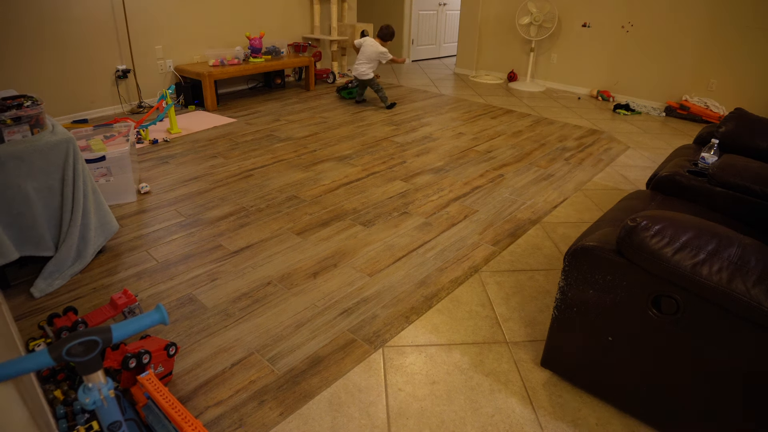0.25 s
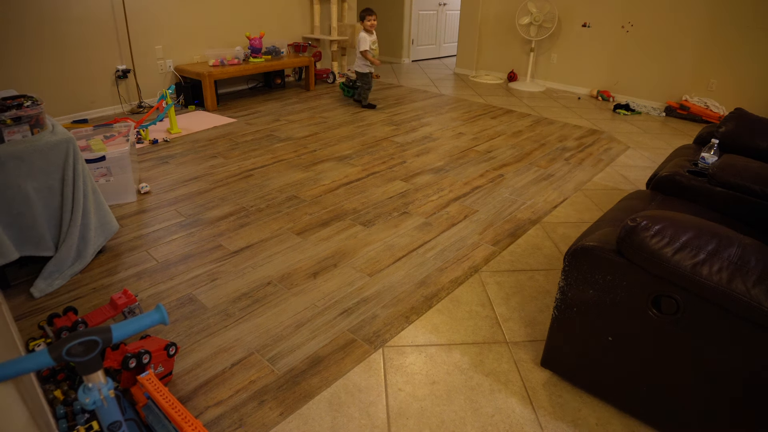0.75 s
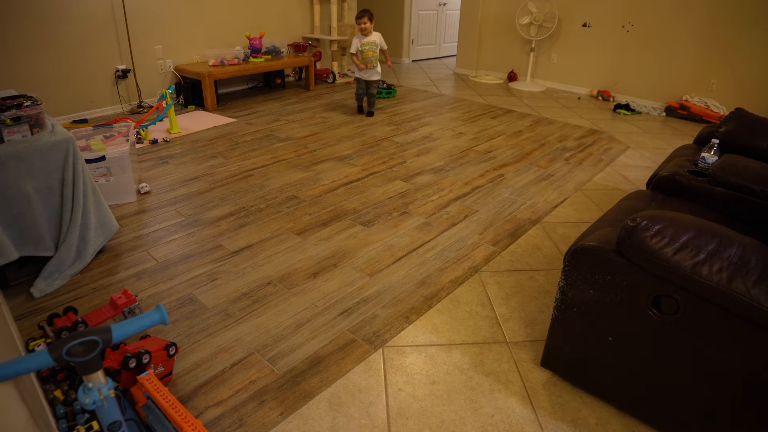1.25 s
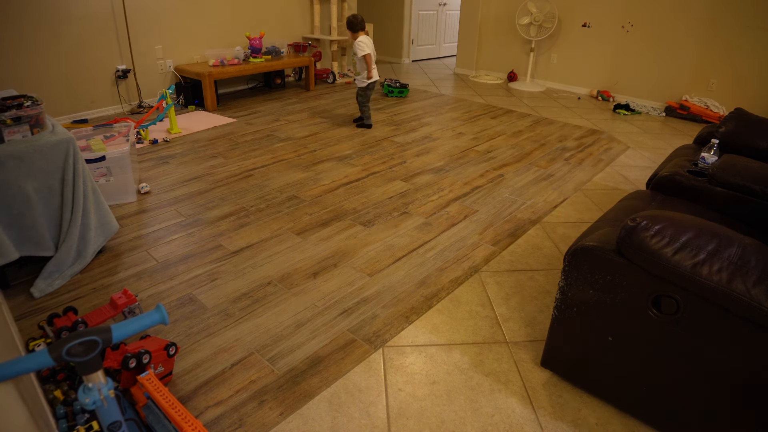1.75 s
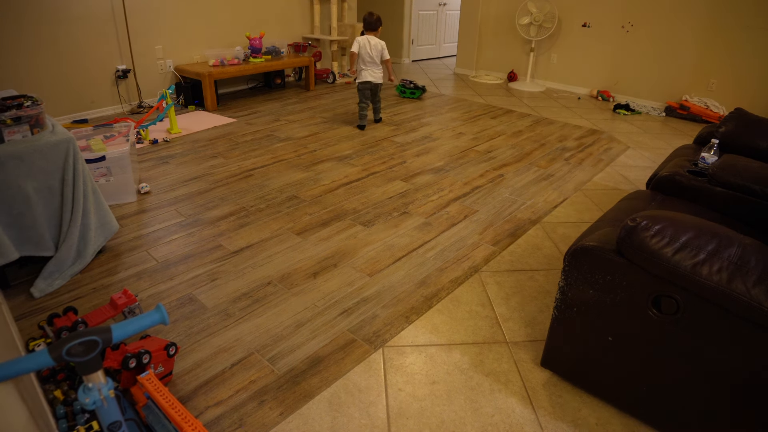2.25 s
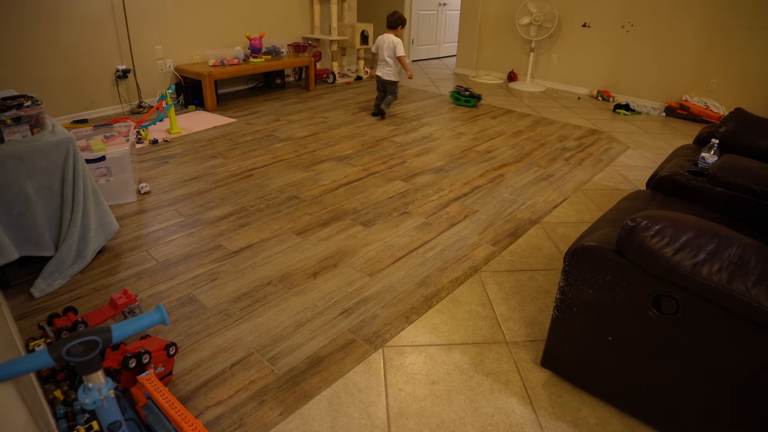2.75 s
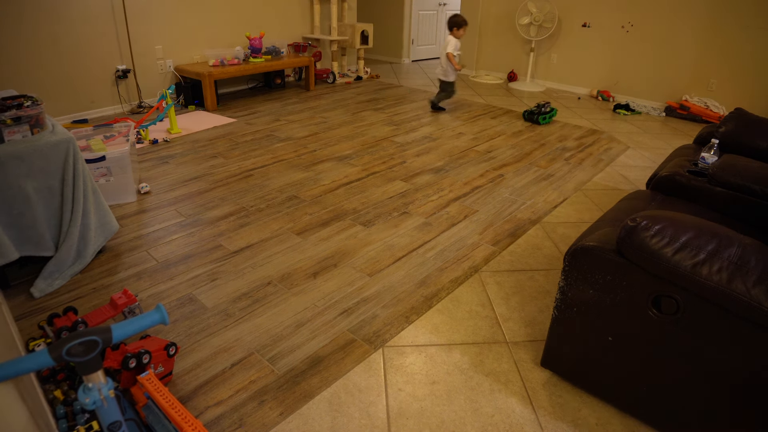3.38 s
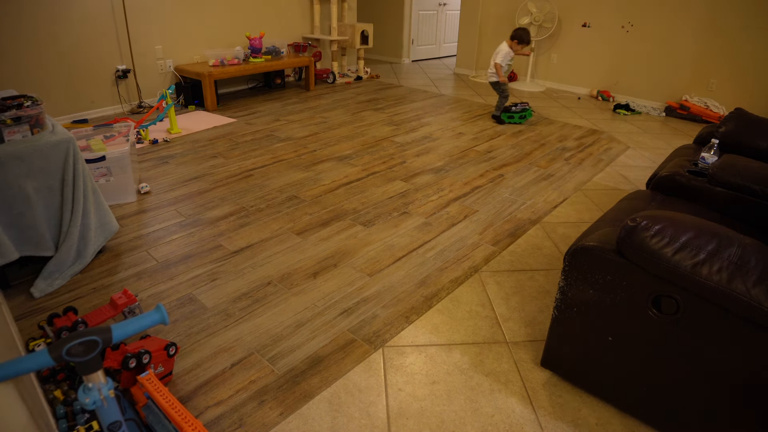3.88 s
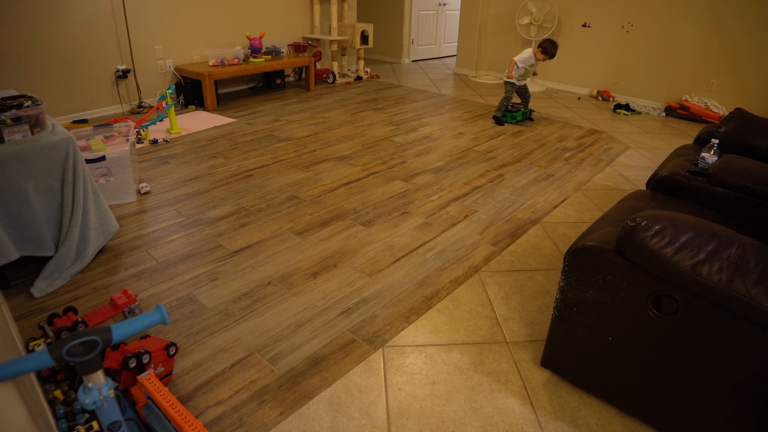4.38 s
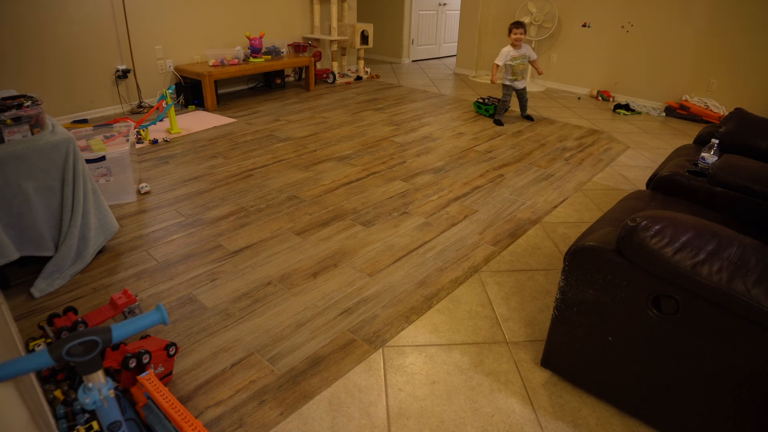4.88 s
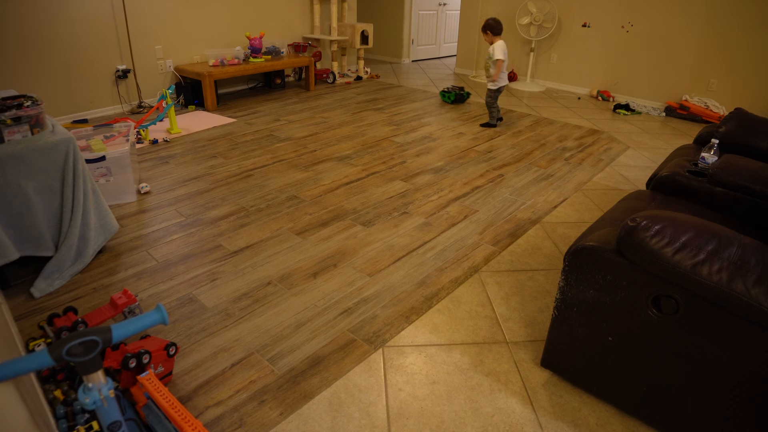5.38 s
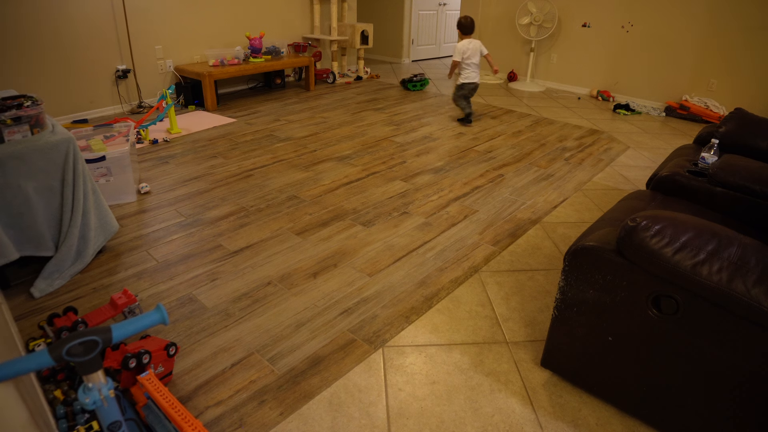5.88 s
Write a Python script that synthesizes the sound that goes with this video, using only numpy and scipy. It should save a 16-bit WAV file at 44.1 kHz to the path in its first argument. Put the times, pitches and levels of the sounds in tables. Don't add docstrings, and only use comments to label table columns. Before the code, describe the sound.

A large bare room with a hard floor, one microphone several metres from a small toy truck; faint still air and mains hum lie beneath. The truck is already rolling, its motor cut at about 0.1 s. It whines again from 0.45 to 1.1 s, with a hard knock and squeal at 0.6, then gives a short spurt from 1.3 to 1.8. The longest run, 2.0 to 3.1, starts with a bright, strained whine and is jolted by a bump at 2.4. Another spurt runs 3.45 to 3.95; a brief scuffing shove follows at 4.1 while coasting. A very short spurt comes at 4.2 to 4.5, then a long one from 4.7 to almost 6, wavering, dipping sharply near 5.15 and bumping at 5.55. Throughout, shrill gritty gear whine near 3.5 kHz with hissing overtones, plastic clatter, wandering squeals, tyre scrub and light floor rumble, smeared by room echo.

```python
import sys
import numpy as np
from scipy import signal
from scipy.fft import rfft, irfft, next_fast_len
from scipy.io import wavfile
from scipy.ndimage import uniform_filter1d, map_coordinates

SR = 44100
rng = np.random.default_rng(int(sys.argv[2]) if len(sys.argv) > 2 else 0)


def wrap_up_sound(samples):
    columns = np.atleast_2d(samples).T
    tamed = np.clip(columns, -1, 1)
    steps = np.round(tamed * 32767).astype(np.int16)
    wavfile.write(sys.argv[1], SR, steps)


def gain_from_db(level_db):
    decades = np.asarray(level_db, float) / 20
    return 10 ** decades


N = 270818
TICKS = np.arange(0, N / SR, .002)

# f/Hz, density/dB
AIR_SPECTRUM = [(20, -32), (42, -22), (60, -9), (100, -12), (200, -1), (500, -6.5), (1500, -19),
                (5000, -21), (10000, -35), (16000, -60)]
# f/Hz, t60/s
ROOM_DECAY = [(200, 1), (2000, 1), (5000, 0.89), (12000, 0.67), (16000, 0.34)]
# f/Hz, density/dB
RUMBLE_SPECTRUM = [(60, -56), (150, -16), (300, -4), (500, -1), (750, -2.5), (1200, -24)]
# t/s, level/dB, half length/s
FLOOR_JOINTS = [(.12, 7, 0.13), (.47, -16, 0.09675), (.61, 4, .07), (1.02, 8, 0.33), (1.54, 4, .15),
                (3.03, 6, 0.0462), (2.07, -8, 0.055), (3.36, -12, .22), (3.68, 5, .12), (4.14, 12, 0.1138),
                (4.43, 5, 0.18), (4.63, 6, 0.092), (4.86, -3, 0.192), (5.3, 5, 0.3429), (5.97, 3.5, 0.0988)]
# f/Hz, density/dB
TYRE_SPECTRUM = [(250, -22), (600, -11.5), (950, -1.5), (1150, -4.5), (1600, -1), (2200, 0), (3000, -5.5),
                 (4500, -58)]
# t/s, peak level/dB
BUMP_KNOCKS = [
    (0.436, -20),
    (0.6187, 4),
    (2.4193, -1),
    (2.8994, -37),
    (3.0191, -16),
    (4.1118, -22),
    (4.1297, -23),
    (5.1765, -16),
    (5.5476, -7),
    (5.869, -20),
]
# f/Hz, width/Hz, level/dB
SHELL_MODES = [
    (970, 191.3, 1),
    (1330, 97, 8),
]
# t/s, level/dB, time to lose 12 dB/s
BODY_RINGS = [(.08, -38, .1), (.2, -44, .08), (.62, -40, .12), (1.09, -40.5, .3), (1.88, -39, .1),
              (2.07, -35, .07), (2.9, -45, .2), (3.36, -40, .25), (3.85, -46, .3), (4.26, -46, .3),
              (4.89, -40.5, .15), (5.32, -42, .1), (5.87, -34, .06), (5.94, -36, .07)]
# f/Hz, level/dB
CHASSIS_COLOUR = [(1500, 5), (2600, 0), (3500, -1.5), (4100, -5), (5400, 14), (6200, -5), (6800, -12),
                  (7500, -5.5), (8700, -11), (10200, -3.5), (12500, -21), (15700, -30)]
# f/Hz, density/dB
CLATTER_SPECTRUM = [(1200, -44), (2200, -11.5), (2800, -5), (3500, -5), (4100, -7.5), (5400, -4.5),
                    (6200, -8.5), (6900, -15.5), (8000, -16), (11000, -32)]
# f/Hz, density/dB
HISS_SPECTRUM = [(5500, -12), (7500, -4), (8700, -5), (10200, -3.5), (11500, -5.5), (13000, -10.5),
                 (15000, -33), (16500, -33)]
# t/s, gear clatter level/dB, treble facing us level/dB, tyre scrub level/dB
DRIVING_LOAD = [(0, -32, -4.5, 1), (.12, -30, -10.5, 2.5), (.61, -31.5, -8, -0.5), (.79, -31, -9.5, -0.5),
                (.9, -31.5, -8, 1), (1.4, -29.5, -7.5, -1), (1.54, -35, -3.5, 0.5), (1.76, -35.5, -6.5, -2),
                (2.15, -30, -5.5, -0.5), (2.91, -30.5, -6.5, 1), (2.99, -33, -5, -1), (3.7, -31, -4.5, 0),
                (4.3, -29.5, -8, 0.5), (4.62, -30, -8, 0.5), (4.9, -31.5, -5, -1.5), (5.35, -31, -8.5, 1.5),
                (5.76, -34.5, -8, -2), (5.88, -30.5, -8.5, 1)]
# t/s, level/dB, half length/s
LOAD_JOLTS = [
    (.77, -2, .05),
    (1.81, 3.5, 0.034),
    (1.86, 3, 0.029),
    (1.895, 4, .025),
    (3.21, -4, 0.12114),
    (3.96, 3, 0.0508),
    (4.5, 1, 0.0596),
    (5.06, -2, .04),
]
# t/s, highest treble level/dB, half length/s
TREBLE_DULLING = [
    (.77, -13, .1),
    (2.95, 4, .1),
    (4.14, -7, .07),
    (5.65, -8, .3),
    (6.02, -4, 0.21),
]
# t/s, level/dB, time to lose 12 dB/s, pitch f/Hz, glide/Hz per s
GEAR_SQUEALS = [(.1, -35, .11, 5700, 1000), (.63, -25.5, .11, 5550, 500), (.73, -31, .09, 5550, 0),
                (.88, -34, .1, 5300, 6000), (1.08, -38, .15, 5400, -1500), (1.41, -31, .05, 4780, 1800),
                (1.78, -37, .03, 5300, 0), (1.82, -36, .04, 4650, 0), (2.12, -32, .08, 5900, 3000),
                (2.44, -31, .06, 5650, -10000), (2.53, -31, .06, 4800, -4000),
                (2.61, -29.5, .09, 5600, 1500), (3.14, -36.5, .07, 5400, 500),
                (3.94, -33, .07, 5350, -9000), (4.28, -33, .05, 5400, 4000), (4.47, -35, .09, 5900, -6000),
                (4.56, -39, .12, 4950, -1000), (4.78, -37, .08, 5650, 9000), (4.88, -33, .09, 6120, 0),
                (5.02, -37, .08, 5880, -3000), (5.1, -30, .025, 5230, 0), (5.45, -41, .1, 5320, 0),
                (5.89, -32, .08, 5350, 7000), (5.99, -33, .06, 4750, -3000)]
# power on t/s, power off t/s, coasting fade/dB per s,
# second overtone level/dB while labouring, the same at speed level/dB
TRIGGER_PULLS = [
    (-.5, .135, 110, -3, -4),
    (.46, 1.08, 91, -5, -5),
    (1.332, 1.785, 90, -6, -6),
    (2.02, 3.125, 57, 16, -2),
    (3.446, 3.95, 140, 6, -1),
    (4.188, 4.5, 86, -1, -8),
    (4.695, 5.97, 109, -5, -2),
]
# t/s, tooth rate at full spin f/Hz
TOOTH_RATE = [(0, 3504), (.57, 3500), (.7, 3290), (1.05, 3465), (1.45, 2940), (1.5, 3765), (2.55, 3620),
              (2.8, 3400), (2.99, 3772), (3.03, 3430), (3.09, 3664), (3.9, 3573), (4.5, 3401), (4.78, 3700),
              (5.16, 3660), (5.2, 3420), (5.58, 3790), (5.83, 3420)]
# t/s, level under power/dB
WHINE_LEVEL = [(0, -23), (.13, -28.5), (.6, -28.5), (.7, -29.5), (1.05, -28), (1.48, -37.5), (1.53, -28),
               (1.77, -32), (2.27, -25.5), (2.6, -28.5), (2.74, -24.5), (3.12, -27.5), (3.62, -25.5),
               (3.93, -25.5), (4.36, -31), (4.9, -25), (5.46, -24.5), (5.95, -29)]
# t/s, level/dB, half length/s
TOOTH_SLIPS = [
    (1.45, -6, 0.051),
    (2.5, -6, .05),
    (2.96, -15, 0.057),
    (3.031, 4, 0.02592),
    (4.417, 8, 0.0408),
    (5.062, -7, .035),
    (5.152, -19, .03),
    (5.176, 11.5, 0.01515),
    (5.217, -5, 0.06),
    (5.514, -4, 0.055),
]
# multiple, level/dB
TOOTH_OVERTONES = [
    (1, -2.5),
    (2, -4.5),
    (3, -7),
    (4, 5),
]
# t/s, second overtone level/dB, half length/s
PINION_TURNS = [
    (1.02, 3, .1),
    (2.27, 2, .06),
    (2.82, 4, .1),
    (4.38, 8, .06),
    (4.9, 4, .08),
    (5.2, -5, .2),
    (5.76, 6, 0.13),
    (5.95, -8, .1),
]


def unit(x):
    return x / np.sqrt(np.mean(x ** 2) + 1e-20)


def along(points, hz):
    f, v = np.transpose(points)
    return np.interp(np.log(hz + 1), np.log(f + 1), v)


def curves(rows):
    s, *cols = np.transpose(rows)
    return [np.interp(np.arange(N) / SR, s, c) for c in cols]


def wobble(rate):
    knots = rng.standard_normal(int(N * rate / SR) + 4)
    return map_coordinates(knots, [np.arange(N) * rate / SR])


def flutter(rate):
    knots = rng.standard_normal((int(N * rate / SR) + 4, 2)) @ [1, 1j]
    return np.interp(np.arange(N) * rate / SR, np.arange(len(knots)), knots)


def filtered(x, response):
    m = next_fast_len(N + SR // 2)
    return irfft(rfft(x, m) * response(np.fft.rfftfreq(m, 1 / SR)), m)[:N]


def rattle(spectrum, patchy_db, spiky_db):
    contacts = gain_from_db(spiky_db * np.pad(wobble(300), (0, 512)))
    z = signal.stft(rng.standard_normal(N + 512) * contacts, nperseg=512)[2]
    patches = uniform_filter1d(rng.standard_normal(z.shape), size=8, axis=0)
    patches = uniform_filter1d(patches, size=10, axis=1)
    x = signal.istft(z * gain_from_db(patchy_db * unit(patches)), nperseg=512)[1][:N]
    return unit(filtered(x, lambda hz: gain_from_db(along(spectrum, hz))))


def fine(control):
    return np.interp(np.arange(N) / SR, TICKS, control)


def bumps(rows):
    return fine(sum(db * np.maximum(1 - np.abs(TICKS - s) / half, 0) for s, db, half in rows))


def peaks(rows):
    s, db, half = np.transpose(rows)[:3, :, None]
    return db - 12 * np.abs(TICKS - s) / np.abs(half)


def clock(lag_s=0):
    on, off = np.transpose(TRIGGER_PULLS)[:2, :, None]
    return TICKS - lag_s - on, np.maximum(TICKS - lag_s - off, 0)


def latest(rows):
    now = np.maximum((clock()[0] >= 0).sum(axis=0) - 1, 0)
    return fine(rows[now, np.arange(len(TICKS))])


def motion(lag_s=0):
    start_db, start_s = 18.5, .07
    since, after = clock(lag_s)
    coasting_fade = np.transpose(TRIGGER_PULLS)[2, :, None]
    driven = start_db * np.minimum(since / start_s - 1, 0) - coasting_fade * after
    late = TICKS - 4.12
    shove = -4.5 + np.minimum(start_db * late / 0.022, -146 * late)
    return fine(np.maximum(driven.max(axis=0), shove))


def drive_level():
    backlash_db, backlash_s = 2.5, 0.071
    slack = latest(clock()[1]) / backlash_s
    slack_db = backlash_db * slack * np.exp(1 - slack)
    return curves(DRIVING_LOAD)[0] + motion() + slack_db + bumps(LOAD_JOLTS)


def house():
    t = np.arange(N) / SR
    hum = gain_from_db(-66.5 + 1.6 * wobble(9)) * np.sin(2 * np.pi * 119.5 * t + 0.42 * wobble(5.425))
    return hum + gain_from_db(-58.5) * rattle(AIR_SPECTRUM, patchy_db=1.2, spiky_db=0.0)


def room(x):
    hop = SR // 6
    spots = N // hop + 2
    hz, t, z = signal.stft(rng.standard_normal((spots, SR * 3 // 4)), SR, nperseg=256)
    t60 = np.maximum(along(ROOM_DECAY, hz), .1)[:, None]
    tails = signal.istft(z * gain_from_db(-60 * t / t60), SR, nperseg=256)[1]
    tails = tails / np.linalg.norm(tails, axis=1, keepdims=True)
    padded = np.pad(x, (hop, 3 * hop))
    pieces = np.lib.stride_tricks.sliding_window_view(padded, 2 * hop)[::hop][:spots]
    wet = signal.fftconvolve(pieces * np.hanning(2 * hop), tails, axes=1)
    out = np.zeros(N + 2 * SR)
    for k, piece in enumerate(wet):
        out[k * hop:][:len(piece)] += piece
    return 0.84 * out[hop - 300:][:N]


def floor_rumble():
    level_db = -47.5 + bumps(FLOOR_JOINTS) + 0.56 * motion(lag_s=0.038) + 0.5 * wobble(7)
    return gain_from_db(level_db - 0.4) * rattle(RUMBLE_SPECTRUM, patchy_db=2.0, spiky_db=-1.5)


def tyres():
    load_db, _, scrub_db = curves(DRIVING_LOAD)
    level_db = -33.5 + scrub_db + 0.53096 * (drive_level() - load_db.mean())
    return gain_from_db(level_db + 1.2 * wobble(9.2)) * rattle(TYRE_SPECTRUM, patchy_db=0.5, spiky_db=1.5)


def knocks():
    x, t = np.zeros(N + SR), np.arange(SR // 10) / SR
    for s, db in BUMP_KNOCKS:
        x[round(s * SR):][:len(t)] += gain_from_db(db - 18 - 60 * t / 0.027) * rng.standard_normal(len(t))
    return filtered(x[:N], lambda hz: gain_from_db(along(CHASSIS_COLOUR, hz)) * hz / (hz + 900))


def shell():
    def modes(f):
        return sum(gain_from_db(db) * 1j * f * w / (c * c - f * f + 1j * f * w) for c, w, db in SHELL_MODES)

    once = filtered(rng.standard_normal(N), modes)
    rest_db = -53
    strain_db = fine(np.maximum(peaks(BODY_RINGS).max(axis=0), rest_db))
    return gain_from_db(strain_db + 0.2 * motion() + 1.5 * wobble(30) - 1) * unit(filtered(once, modes))


def gears():
    facing_db = curves(DRIVING_LOAD)[1]
    since, after = map(latest, clock())
    hiss_db = facing_db - 0.5 * np.exp(-since / .1) - 9 * np.minimum(after / 0.065, 1)
    load = gain_from_db(drive_level() + 0.19 * wobble(14))
    clatter = gain_from_db(1.5) * rattle(CLATTER_SPECTRUM, patchy_db=2.0, spiky_db=1.0)
    grit = rattle(HISS_SPECTRUM, patchy_db=3.2, spiky_db=2.6)
    top = filtered(grit, lambda hz: 1 / (1 + (15000 / (hz + 1)) ** 8))
    beam_db = 0.68 * (hiss_db - facing_db.mean()) + bumps(TREBLE_DULLING) + 2.5 * wobble(25)
    hiss = gain_from_db(hiss_db - 0.35 + 1.8 * wobble(12)) * (grit - top + gain_from_db(beam_db) * top)
    return load * (clatter + hiss)


def idler():
    levels = peaks(GEAR_SQUEALS)
    s, _, _, pitch, glide = np.transpose(GEAR_SQUEALS)[:, levels.argmax(axis=0)]
    hz = fine(np.clip(pitch + glide * (TICKS - s), 4500, 6300))
    db = fine(levels.max(axis=0)) + .5 * motion()
    blur = flutter(900) + .8 * flutter(300)
    tone = gain_from_db(3 * wobble(100)) * blur * np.exp(2j * np.pi * np.cumsum(hz) / SR)
    return gain_from_db(db) * unit(tone.real)


def pinion():
    pinion_teeth = 16
    since, after = map(latest, clock())
    rate = curves(TOOTH_RATE)[0] * (1 - .5 * np.exp(-since / .1) - .18 * after)
    swell_db = -28 * np.exp(-(since / .075) ** 2)
    cut_db = -10 * np.minimum(after / 0.02, 1) - 45 * after
    whine_db = curves(WHINE_LEVEL)[0] + bumps(TOOTH_SLIPS) + swell_db + cut_db

    labouring, settled = np.transpose(TRIGGER_PULLS)[3:, :, None]
    settling = np.exp(-np.maximum(clock()[0], 0) / 0.084)
    second_db = latest(settled + (labouring - settled) * settling)
    second_db = second_db + bumps(PINION_TURNS) + 3 * wobble(40) - 1.5
    upper_db = curves(DRIVING_LOAD)[1] - 1 + 0.66 * bumps(TREBLE_DULLING)

    phase = 2 * np.pi * np.cumsum(rate * (1 + .012 * wobble(55))) / SR
    turn = np.exp(1j * phase / pinion_teeth)
    jolts = gain_from_db(1.6 * wobble(120))

    def overtone(k, db):
        strands = .3 + flutter(190 * k) + .7 * flutter(170 * k) / turn + .45 * flutter(170 * k) * turn
        return gain_from_db(db) * unit((jolts * strands * np.exp(1j * k * phase)).real)

    first, second, *upper = [overtone(k, db) for k, db in TOOTH_OVERTONES]
    beamed = sum(unit(gain_from_db(3.5 * wobble(35))) * x for x in upper)
    tone = first + gain_from_db(second_db) * second + gain_from_db(upper_db) * beamed
    return filtered(gain_from_db(whine_db + 0.96) * tone, lambda hz: gain_from_db(along(CHASSIS_COLOUR, hz)))


def scene():
    truck = floor_rumble() + tyres() + knocks() + shell() + gears() + idler() + pinion()
    truck = filtered(truck, lambda hz: 1 / (1 + (130 / (hz + 1)) ** 4))
    mono = gain_from_db(-1.5) * truck + gain_from_db(-5.5) * room(truck) + house()
    return np.array([mono, mono])


def low_pass(x):
    return signal.sosfilt(signal.butter(12, 15690, fs=SR, output="sos"), x)


def record(dry):
    heard = filtered(dry[0], lambda hz: (hz < 15700) / (1 + (30 / (hz + 1)) ** 2))
    return low_pass(np.array([heard, heard]))


dry = scene()
out = record(dry)
wrap_up_sound(out)
```